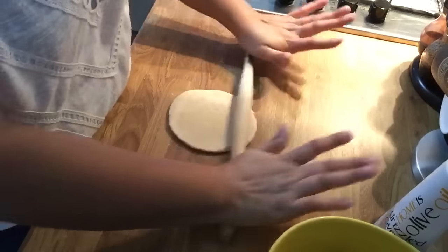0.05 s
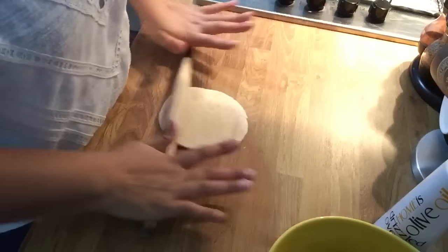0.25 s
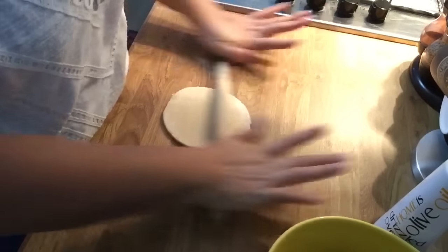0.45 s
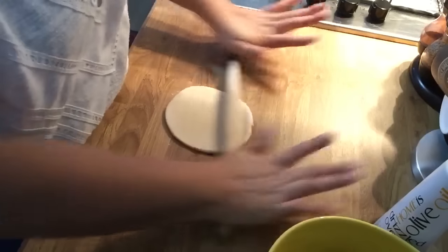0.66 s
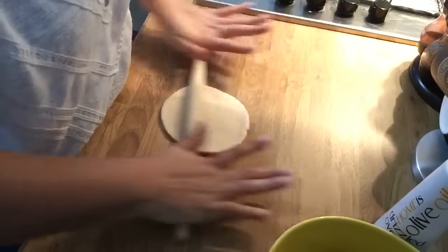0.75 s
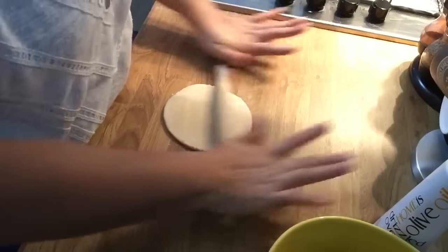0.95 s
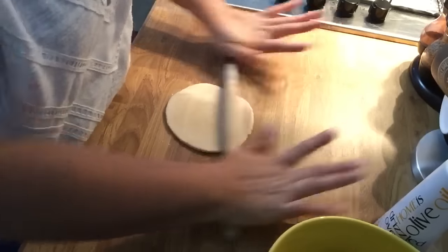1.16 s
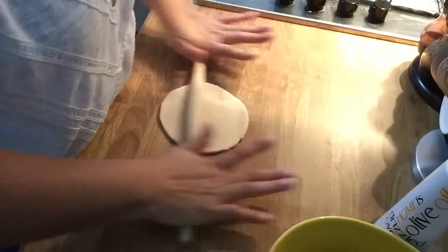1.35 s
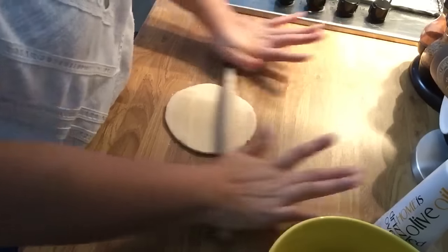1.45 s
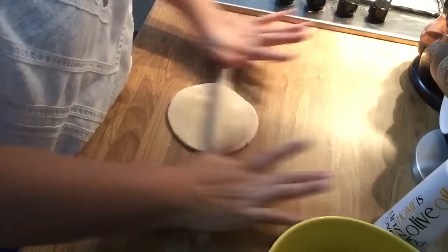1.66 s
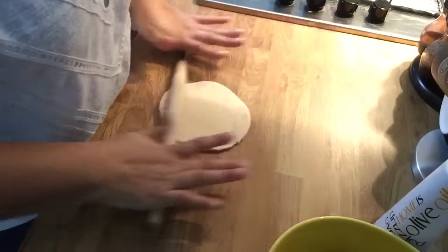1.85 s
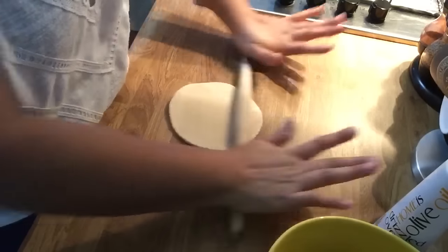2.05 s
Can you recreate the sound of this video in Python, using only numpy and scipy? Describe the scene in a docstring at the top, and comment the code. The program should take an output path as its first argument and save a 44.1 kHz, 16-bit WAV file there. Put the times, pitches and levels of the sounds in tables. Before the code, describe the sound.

A wooden rolling pin knocks on a worktop, then rolls softly to and fro over dough.

```python
"""Rolling out dough

A thin wooden rolling pin is pushed quickly to and fro over a small round of dough on a wooden worktop.
On the first strokes it drops off the edge of the dough, knocks on the wood and skids a little. Then the
palms swish on over the pin, with a few soft bumps and faint skids. A small, quiet kitchen rings briefly."""
import sys
import numpy as np
from scipy import signal
from scipy.fft import rfft, irfft
from scipy.io import wavfile

SR = 44100
rng = np.random.default_rng(int(sys.argv[2]) if len(sys.argv) > 2 else 0)


def int16_out(signal):
    """Quantize to a 16-bit WAV file."""
    q = np.round(np.clip(np.atleast_2d(signal).T, -1, 1) * 32767)
    wavfile.write(sys.argv[1], SR, q.astype(np.int16))


N = 92610
LEAD = SR // 5   # extra samples before time 0, so sounds can already be ringing
TIME = np.arange(-LEAD, N) / SR

# The pin hits the worktop; where it lands sets the tone: (time [s], force [dB], brightness [Hz],
# favoured pitch [Hz], its boost [dB], room share [dB], counter ring [dB], pin ring [dB],
# lag at 1 kHz [s], pitch factor of the low wood tones [ratio], boom [dB], body [dB], hollow ring [dB],
# crack [dB])
KNOCK_HITS = [(-.075, -7, 2970, 1830, 1, -1.5, -7, 0, 0.00096, 1.16, -1, 5.5, 2, 4),
              (0.2103, -3, 5620, 2780, 2.4, -1, 3.5, -8, .0012, 1.06, -0.5, 0.5, -0.5, 1.5),
              (.483, -1, 4000, 1770, 7.6, -2.5, 0, 2, 0.001817, 1.04, 5.5, 1.5, 4, 0.5),
              (.521, -9.5, 1700, 500, 3.3, -1, -4, -13, 0.0019, 1.2, -2, 0.5, 0, -10),
              (0.7644, -4.5, 1090, 870, 2.8, -1, 6, -15, .0012, 0.98, 0.5, -0.5, -2, 3.5),
              (1.0584, -2.5, 1310, 920, 7.4, -6.5, -1, -15, 0.0017, 1.13, -14, -3.5, -4.5, -3)]
# Pitch ranges of a knock's boom, body, hollow ring and crack: (from [Hz], to [Hz])
TONE_RANGES = [(100, 180), (225, 600), (800, 1400), (1500, 2200)]
# Pin and worktop ring together: (pitch [Hz], level [dB], ring time [s])
# A ring time is how long a tone takes to fade by 60 dB.
WOOD_TONES = [(209.4, -41, 0.052), (386, -33.5, 0.035), (570, -41.5, 0.034), (902, -44, 0.052),
              (1025.5, -45, 0.089), (1320, -49.5, 0.06), (1632, -31, 0.032), (1790, -33, 0.029),
              (2103, -25, 0.011), (2640, -28, 0.013), (3003, -25, 0.015), (3778, -24, 0.0086),
              (4260, -27.5, 0.002), (5490, -27, 0.018), (7460, -19, 0.0023)]
# Long, low tones of the counter and the kitchen: (pitch [Hz], level [dB], ring time [s])
COUNTER_TONES = [(120.5, -64, 0.56), (150, -52, 0.31), (187.8, -59, 0.43), (202, -44, 0.21),
                 (237, -71.5, 0.22), (257, -52, 0.27), (307.3, -81, 0.48), (352, -46.5, 0.18),
                 (424, -59.5, .2), (444.6, -55.5, 0.14), (501, -47, 0.19), (563.7, -53, 0.25),
                 (861, -52.5, .18)]
# The loosely held pin rings on: (pitch [Hz], level [dB], ring time [s])
PIN_TONES = [(955, -43, 0.23), (1002, -45.5, 0.31), (1053, -53.5, 0.3), (1650, -61, 0.17), (1782, -58, .22),
             (1890, -65, 0.26)]
# The pin skids on the wood: (start [s], level [dB], rise [s], fade [s])
SKID_SWELLS = [(0.21, -44.5, 0.008, .012), (0.486, -54.5, .02, 0.06), (.764, -45, 0.0063, 0.025),
               (1.042, -58, 0.024, 0.023), (1.058, -50.5, 0.014, 0.011), (1.238, -61, 0.035, 0.045),
               (1.825, -68, 0.04, 0.018), (1.966, -66, .016, 0.027)]
# Tones of the skidding pin: (pitch [Hz], level [dB], ring time [s])
SKID_TONES = [(1700, -5, 0.0085), (2626, 2.5, 0.0061), (3886, 0, 0.0082), (5637, -8.5, 0.015),
              (7100, -13.5, 0.006)]
# One swish of the palms for each stroke: (middle [s], hiss [dB], rumble [dB], half width [s])
STROKES = [(.0, -64, -71.5, 0.052), (0.249, -57, -61, 0.037), (0.532, -63.5, -72, 0.059),
           (0.791, -61, -62, 0.037), (1.061, -67, -87, 0.052), (1.3, -97, -80.5, 0.045),
           (1.521, -69.5, -75.5, 0.063), (1.787, -66, -71, 0.053), (2.06, -66.5, -70, 0.066)]
# Hiss of skin on wood: (frequency [Hz], level [dB])
PALM_SPECTRUM = [(100, -13), (680, -7), (1000, 1.5), (1500, 0.5), (2200, -2), (2600, 2), (3200, -4.5),
                 (3850, -1.5), (4700, -6), (5600, -4.5), (8000, -10), (11000, -15), (16000, -20)]
# Rumble of the rolling pin: (frequency [Hz], level [dB])
RUMBLE_SPECTRUM = [(25, 3), (70, -1), (190, -1), (380, 3.5), (680, -16.5), (2000, -37)]
# Pin and hands bump the dough: (time [s], level [dB], pitch [Hz], ring time [s])
DOUGH_BUMPS = [(.002, -47.5, 96, 0.15), (1.286, -47, 46, 0.12), (1.737, -58.5, 200, 0.082),
               (1.861, -43.5, 192, 0.033), (1.872, -48.5, 136, 0.032), (1.9586, -45, 444, 0.019),
               (1.983, -46.5, 176, 0.052)]
# Puffs of fine, floury hiss: (start [s], level [dB], rise [s], fade [s])
FLOUR_SWELLS = [(.21, -66, .001, .035), (.483, -69, .001, .035), (.766, -69, .008, .015),
                (1.05, -68, .015, .015), (1.21, -77.5, 0.057, 0.081)]
# Tone of that hiss: (frequency [Hz], level [dB])
FLOUR_SPECTRUM = [(2000, -23), (6000, -4), (8500, 7), (11000, 0), (16000, -13)]
# The kitchen's lingering sound: (frequency [Hz], level [dB], ring time [s])
ROOM_TAIL = [(200, -11, 0.14), (500, -3.5, 0.29), (1000, 5.5, .26), (1940, -3, 0.34), (4000, -5.5, 0.28),
             (8300, -2.5, 0.13), (15200, 20, 0.29)]
# Echoes from nearby surfaces: (delay [s], level [dB])
NEAR_ECHOES = [(.0078, -9.5), (0.043, -37.5)]
# The steady hush of the room: (frequency [Hz], level [dB])
HUSH_SPECTRUM = [(15, -62), (25, -20), (69, 4), (359, -0.5), (722, -5), (1950, -9.5), (2560, -7.5),
                 (4870, -12), (5430, -8.5), (10400, -19), (15500, -18.5)]

ROOM_DELAY_S, ROOM_HOLD_S = .005, 0.0083   # the tail starts late and holds before it fades
SKID_ROOM_DB, HUSH_DB = -7, -69.5
BOOM_DB = -16   # how strongly swishes and bumps stir the counter


def knock(s, force_db, bright_hz, boost_hz, boost_db, room_db, counter_db, pin_db, lag_s, pitch,
          *range_db):
    """One blow, duller when dough cushions it. Returns the direct sound and the share for the room."""
    blow = butter_filter(click(s) + 1e-18, 3, bright_hz, "low")
    favoured = signal.lfilter(*signal.iirpeak(boost_hz, Q=7.5, fs=SR), blow)
    push = from_db(force_db) * (blow + (from_db(boost_db) - 1) * favoured)
    clack = struck_wood(push, WOOD_TONES, lag_s, pitch, range_db, sign=-0.99)
    after_ring = from_db(counter_db) * counter(push, lag_s, range_db)
    after_ring += from_db(pin_db) * struck_wood(push, PIN_TONES, lag_s)
    return clack + delayed(after_ring, ROOM_DELAY_S), from_db(room_db) * clack


def struck_wood(push, tones, lag_s, pitch=1, range_db=(), sign=1):
    """Pushed wood rings with several tones at once. A negative sign flips every second tone."""
    sound = 0
    for k, (hz, db, ring_s) in enumerate(tones):
        extra_db = sum(extra for extra, (low, high) in zip(range_db, TONE_RANGES) if low < hz < high)
        tone = ring(push, hz * (pitch if hz < 700 else 1), ring_s)
        arrival_s = lag_s * np.sqrt(1000 / hz)   # low bending waves travel slowest
        sound = sound + sign ** k * from_db(db + extra_db) * delayed(tone, arrival_s)
    return sound


def counter(push, lag_s=0, range_db=()):
    """The counter rings low and long, but gives off little deep bass."""
    boom = struck_wood(push, COUNTER_TONES, lag_s, range_db=range_db)
    return butter_filter(boom, 2, 132, "high")


def skids(slips_per_s=5600, spread_db=2):
    """Thousands of tiny slips on floury wood set the pin ringing, which makes a rasp."""
    size = len(TIME)
    slips = (rng.random(size) < slips_per_s / SR) * rng.choice([-1, 1], size)
    slips = slips * from_db(spread_db * np.minimum(rng.exponential(1, size), 4))
    rasp = sum((-1) ** k * from_db(db) * ring(slips, hz, ring_s)
               for k, (hz, db, ring_s) in enumerate(SKID_TONES))
    return unit_level(rasp) * swells(SKID_SWELLS)


def bumps(rise_cycles=0.55, overtone_ratio=2.63, overtone_db=-11.5):
    """Dough cushions each bump into a short thud with one even shorter overtone."""
    sound = 0
    for s, db, hz, ring_s in DOUGH_BUMPS:
        thud = ring(click(s), hz, ring_s)
        overtone = from_db(overtone_db) * ring(click(s), hz * overtone_ratio, ring_s / 2)
        fade_in = np.clip((TIME - s) * hz / rise_cycles, 0, 1)
        sound = sound + from_db(db) * (thud + overtone) * fade_in
    return sound


def swishes():
    """Skin hisses on wood and the pin rumbles softly; both swell and fade with each stroke."""
    hiss, rumble = noise(PALM_SPECTRUM), noise(RUMBLE_SPECTRUM)
    sound = 0
    for middle_s, hiss_db, rumble_db, width_s in STROKES:
        swell = np.exp(-((TIME - middle_s) / width_s) ** 2 / 2)
        sound = sound + (from_db(hiss_db) * hiss + from_db(rumble_db) * rumble) * swell
    return sound


def flour():
    """A fine, high hiss on the early strokes, like flour being brushed along."""
    return noise(FLOUR_SPECTRUM) * swells(FLOUR_SWELLS)


def kitchen(x):
    """The room sends back two clear echoes and a blurred tail that fades band by band."""
    t, room = np.arange(SR // 2) / SR, np.array(ROOM_TAIL)
    edges_hz = np.geomspace(200, 16000, 18)
    tail = 0
    for low, high in zip(edges_hz, edges_hz[1:]):
        hz = np.sqrt(low * high)
        ring_s = at_hz(room[:, ::2], hz)
        band = butter_filter(rng.standard_normal(len(t)), 2, [low, high], "band")
        band *= np.exp(-np.log(1000) * np.maximum(t - ROOM_HOLD_S, 0) / ring_s)
        band *= np.sqrt(2 * (high - low) / SR / np.sum(band ** 2))   # same energy per Hz in each band
        tail = tail + from_db(at_hz(room, hz)) * band
    echoes = sum(from_db(db) * delayed(x, s) for s, db in NEAR_ECHOES)
    return delayed(signal.fftconvolve(x, tail)[:len(x)], ROOM_DELAY_S) + echoes


def room_hush():
    """The faint, steady noise of a quiet kitchen."""
    return from_db(HUSH_DB) * noise(HUSH_SPECTRUM)


def click(s):
    """A click of height 1 at s seconds."""
    return 1.0 * (np.arange(len(TIME)) == LEAD + round(s * SR))


def ring(x, hz, ring_s):
    """Each click in x starts a pure tone that dies away."""
    decay, angle = np.exp(-np.log(1000) / (ring_s * SR)), 2 * np.pi * hz / SR
    return signal.lfilter([0, np.sin(angle)], [1, -2 * decay * np.cos(angle), decay * decay], x + 1e-18)


def noise(spectrum):
    """Noise of average level 1, with lows and highs shaped by the spectrum."""
    hz = np.fft.rfftfreq(len(TIME), 1 / SR)
    white = rfft(rng.standard_normal(len(TIME)))
    return unit_level(irfft(white * from_db(at_hz(spectrum, hz)), len(TIME)))


def swells(rows):
    """A loudness curve: each swell rises evenly, then drops to about a third every fade time."""
    return sum(from_db(db) * np.clip((TIME - s) / rise, 0, 1)
               * np.exp(-np.maximum(TIME - s - rise, 0) / fade) for s, db, rise, fade in rows)


def butter_filter(x, order, hz, keep):
    """Keep the lows, the highs or a band; a higher order cuts more steeply."""
    return signal.sosfilt(signal.butter(order, hz, keep, fs=SR, output="sos"), x)


def delayed(x, s):
    """The sound, s seconds later."""
    return np.concatenate([np.zeros(int(abs(s) * SR)), x])[:len(x)]


def at_hz(points, hz):
    """Read between (frequency, value) points, with octaves evenly spaced."""
    points = np.array(points)
    return np.interp(np.log(np.maximum(hz, 1)), np.log(points[:, 0]), points[:, 1])


def unit_level(x):
    """Scale to an average (rms) level of 1."""
    return x / np.sqrt(np.mean(x ** 2) + 1e-20)


def from_db(db):
    """Turn decibels into a factor to multiply by."""
    return 10 ** (np.asarray(db) / 20)


def scene():
    """Knocks, skids and bumps in the kitchen, over the swish of the palms and the room's hush."""
    skid = skids()
    soft = bumps() + swishes()
    direct = skid + soft + from_db(BOOM_DB) * counter(soft)
    to_room = from_db(SKID_ROOM_DB) * skid
    for hit in KNOCK_HITS:
        near, room_share = knock(*hit)
        direct += near
        to_room += room_share
    mix = direct + kitchen(to_room) + room_hush() + flour()
    return mix[None, LEAD:]


def record(dry, cutoff_hz=15750):
    """Cut off the very highest treble steeply."""
    return signal.sosfilt(signal.ellip(10, .1, 70, cutoff_hz, fs=SR, output="sos"), dry)


dry = scene()
out = record(dry)
int16_out(out)
```